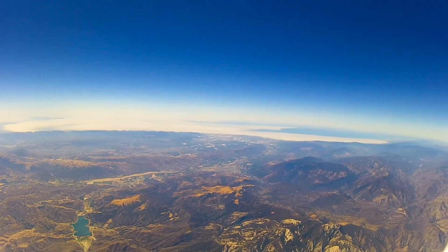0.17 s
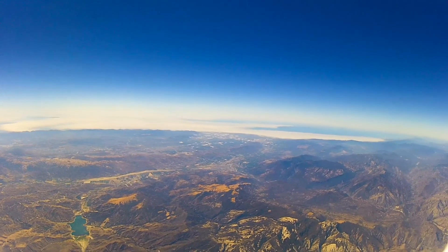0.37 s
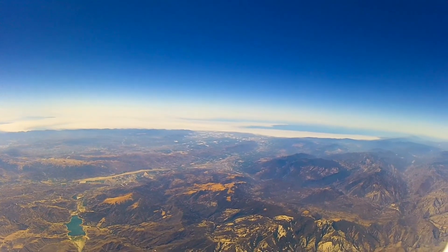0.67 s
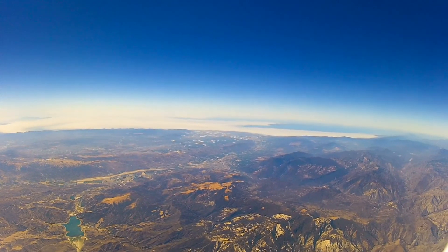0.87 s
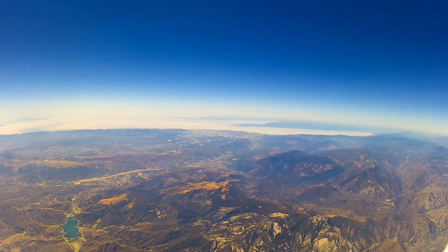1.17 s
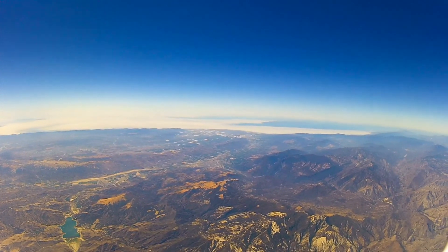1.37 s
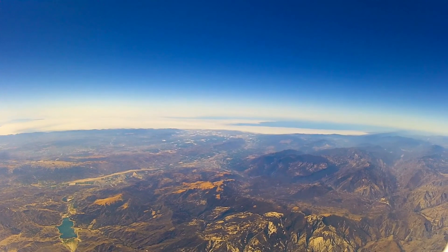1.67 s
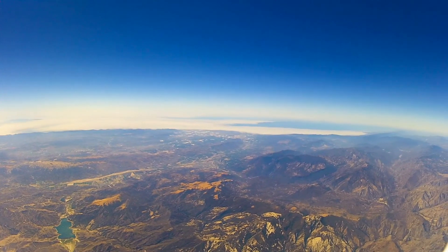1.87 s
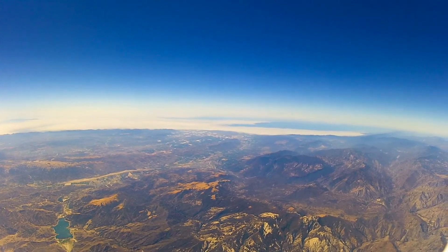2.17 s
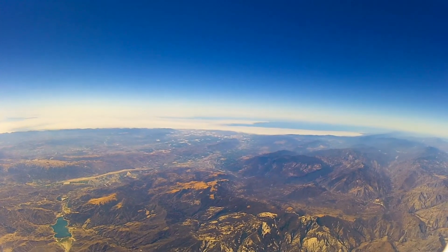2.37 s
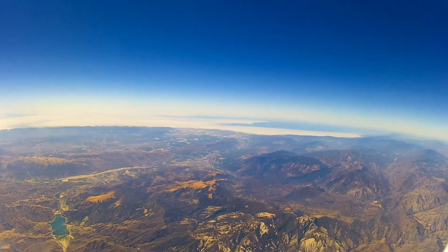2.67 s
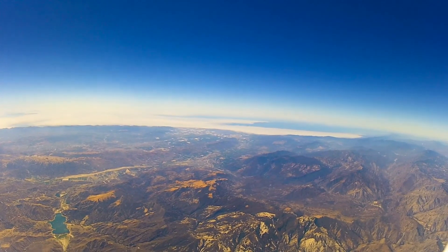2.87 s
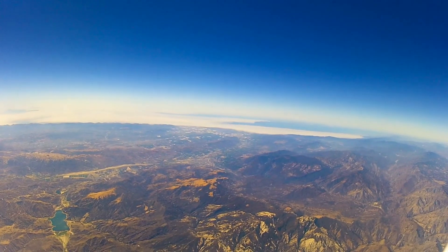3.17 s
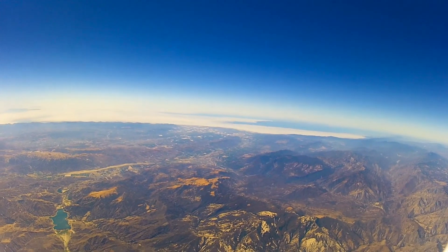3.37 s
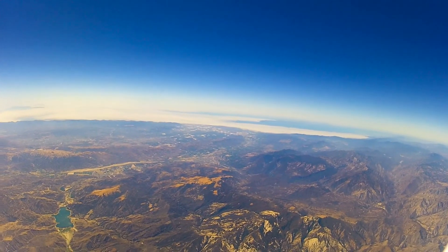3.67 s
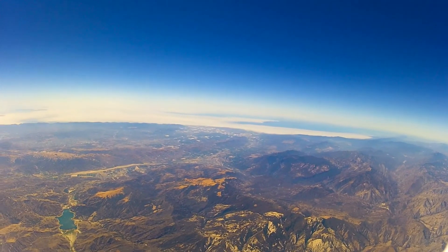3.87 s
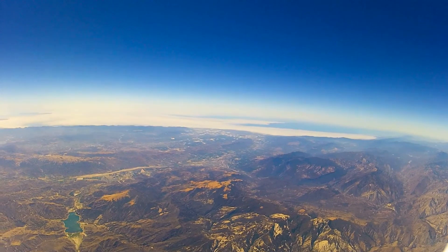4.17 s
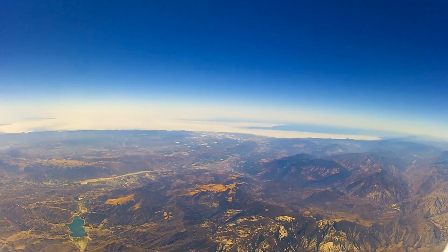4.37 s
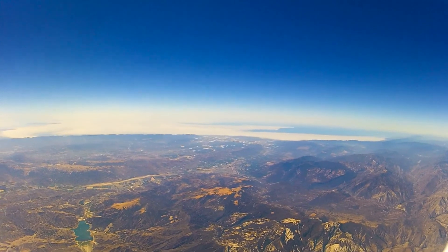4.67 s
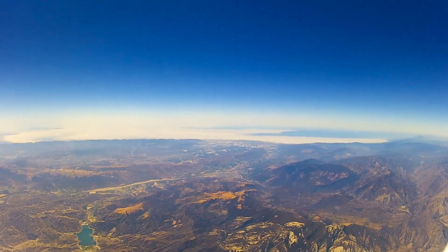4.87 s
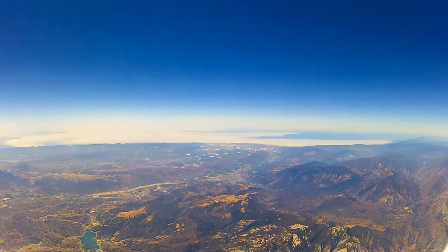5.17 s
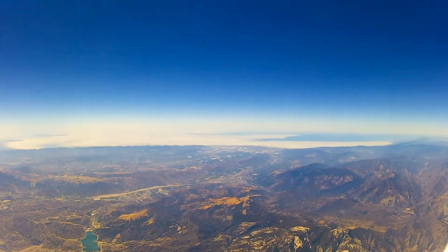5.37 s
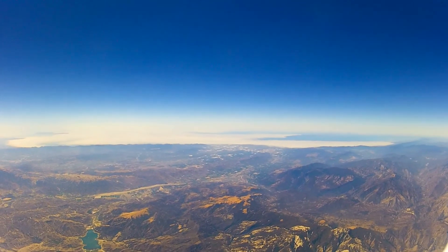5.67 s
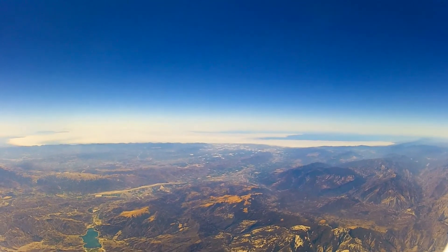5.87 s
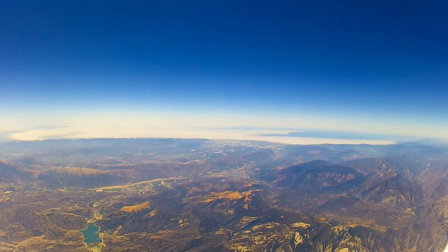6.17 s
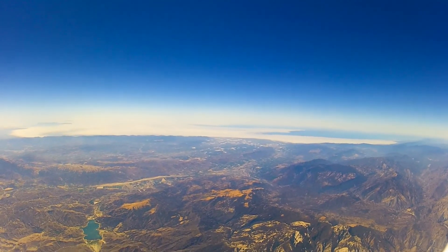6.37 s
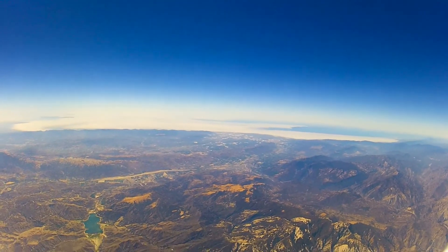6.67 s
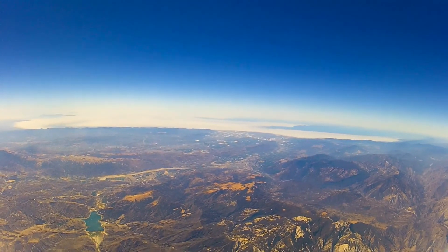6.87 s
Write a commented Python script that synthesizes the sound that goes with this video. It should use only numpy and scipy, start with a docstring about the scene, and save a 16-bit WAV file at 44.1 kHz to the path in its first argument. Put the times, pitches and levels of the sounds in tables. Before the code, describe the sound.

Faint steady low hum under soft hiss, with scattered small plastic clicks and hollow ticks, one far louder sharp knock just past four seconds.

```python
"""A faint, wavering hum of a box under microphone hiss comes first: filtered noise, in a balloon payload
high up in thin, still air. Then the case of a small camera slips in its mount, again and again: each slip
is a gritty crack of noise grains, a short hollow knock of decaying housing modes and a shake of the mount.
The camera samples slowly and holds each sample, which mirrors every low sound into a thin, glassy sheen
around its sampling rate."""
import sys
import numpy as np
from scipy import signal
from scipy.fft import rfft, irfft
from scipy.io import wavfile
from scipy.ndimage import uniform_filter1d

SR = 44100
rng = np.random.default_rng(int(sys.argv[2]) if len(sys.argv) > 2 else 0)


def inscribe(sig):
    """Save sig as 16-bit PCM at rate SR to the path in sys.argv[1].

    A 1-D sig is mono; a 2-D sig holds one channel per row.
    Samples are clipped to [-1, 1] before scaling.
    """
    pcm = np.round(np.clip(np.atleast_2d(sig).T, -1, 1) * 32767)
    wavfile.write(sys.argv[1], SR, pcm.astype(np.int16))


N = 310023

# Spectrum of the microphone hiss. Each row: frequency in Hz, relative level in dB.
HISS_SPECTRUM = [(100, 4), (700, 0.5), (1500, -3.5), (3000, -7), (4500, -8.5), (6000, -8.5)]
# Spectrum of the broad hum in the box. Each row: frequency in Hz, relative level in dB.
HUM_SPECTRUM = [(20, -27), (40, -11.5), (70, -9), (98, -1), (135, -5), (165, -16.5), (250, -20.5),
                (335, -17.5), (450, -26), (800, -37), (2000, -65.5)]
# Spectrum of the crack. Each row: frequency in Hz, relative level in dB.
CRACK_SPECTRUM = [(300, -19.5), (800, -3), (1100, 7), (1400, -1.5), (1800, -6.5), (2150, 4), (2500, -0.5),
                  (2900, 0), (3400, -4), (4200, -8), (5000, -20), (6000, -25)]
# Modes of the housing. Each row: frequency in Hz before the pitch factors, relative level in dB,
# 60 dB decay time in seconds, direction of swing at the microphone as a sign.
HOUSING_MODES = [ (123, -24, .176, -1), (150, -8.1, .046, -1), (237, -9.8, .049, 1), (304, -6.8, .057, -1),
                 (352, .5, .039, 1), (421, -19.6, .056, -1), (456, -15.6, .044, 1), (670, -16.5, .022, 1),
                 (770, -31, .055, -1), (817, -10.5, .018, -1), (1076, -13, .013, -1), ]
# Slips of the case. Each row: time of the ring in seconds, relative level in dB,
# hardness of the contact as dB of crack, thump in dB, pitch factor of the body.
SLIP_EVENTS = [ (0.486, -40.5, -3, 11, 1.52), (0.5569, -22, 4, -0.5, 1.158), (0.5681, -32.5, -6, 10, 1.46),
               (0.6241, -29.5, 6.5, 1, 1.4), (0.631, -34, -2, 5, 1.24), (0.6552, -33, -13, 6, 1.03),
               (1.6443, -66, 27, 0, 1.0), (2.3175, -32, 10, 7.5, 1.36), (2.4156, -60.5, 15.5, 0, 1.0),
               (3.169, -59.5, 19, 7, 1.2), (3.5349, -32, 6, -4, 1.03), (4.2377, 0, 0, 0, 1.0),
               (4.6404, -30, -30, 5.5, 0.98), (4.7960, -34.5, 5.5, 11.5, 1.34),
               (5.3854, -37, -12, 10, 0.98), (5.8103, -49, 11.5, -6, 1.36), (5.9010, -52, -3, -3, 0.93),
               (6.375, -34.5, 8, 13, 1.26), (6.3927, -45.5, 8, 9, 1.67), (6.5304, -29, 7.5, 11.5, 0.67),
               (6.7569, -29, -6, 4.5, 1.21), (6.7763, -34.5, -18, -2, 1.4), (6.7944, -26, -3.5, 9, 1.25),
               (6.8003, -24.5, -17.5, 8.5, .87), (6.836, -33, -22, 9, 0.83), (7.0123, -59.5, 19, 1, 1.0), ]

HOLD_HZ = 12000  # sampling rate of the camera
TOP_HZ = 14900  # upper limit of the held sound
# The briefer the contact, the more it rings the stiff walls: hard and light contacts are brief.
KNOCK_DB_PER_HARD_DB, KNOCK_DB_PER_LIGHT_DB = 0.3333, 0.2026
# A harder contact also rings the walls higher, up to a limit (pitch factors).
WALL_PITCH_PER_HARD_DB, WALL_PITCH_MAX = 0.03, 1.1


def undb(db):
    """Logarithmic level: 20 dB is a factor of ten in amplitude."""
    return 10 ** (np.asarray(db) / 20)


def level(x, db):
    """Root-mean-square level: scale the signal to the given dB."""
    return x * undb(db) / np.sqrt(np.mean(x ** 2))


def fade(t, t60):
    """Exponential damping: the amplitude falls by 60 dB in t60 seconds."""
    return np.exp(-np.log(1000) * t / t60)


def colour(x, points):
    """Minimum-phase filtering: a causal response that follows (Hz, dB) points."""
    hz, db = np.transpose(points)
    size = 2 * len(x)
    freqs = np.maximum(np.fft.rfftfreq(size, 1 / SR), 1)
    log_gain = np.log(undb(np.interp(np.log(freqs), np.log(hz), db)))
    # folding the cepstrum onto positive times makes the response causal
    cepstrum = irfft(log_gain)
    cepstrum[1:len(x)] *= 2
    response = np.exp(rfft(cepstrum[:len(x)], size))
    return irfft(rfft(x, size) * response)[:len(x)]


def resonate(x, hz, width_hz):
    """Simple resonance: a two-pole band-pass with gain 1 at the centre."""
    b, a = signal.iirpeak(hz, hz / width_hz, fs=SR)
    return signal.lfilter(b, a, x)


def resonate_twice(x, hz, width_hz):
    """Cascaded resonance: two equal band-passes give steeper skirts."""
    return resonate(resonate(x, hz, width_hz), hz, width_hz)


def walk(rate):
    """Random drift: twice-averaged random steps, rate per second, with a spread near 1."""
    k = int(SR / rate)
    steps = np.repeat(rng.standard_normal(N // k + 1), k)
    smooth = uniform_filter1d(uniform_filter1d(steps, k), k)
    return 1.4 * smooth[:N]


def hiss():
    """Stationary noise: the microphone hiss keeps one spectrum and one level."""
    return level(colour(rng.standard_normal(N), HISS_SPECTRUM), -64)


def hum(drone_hz=96, drone_width_hz=8, drone_db=-56, box_db=-51.0, waver_db=0.32):
    """Resonance under random excitation: a low hum, strongest at one narrow resonance of the box."""
    box = level(colour(rng.standard_normal(N), HUM_SPECTRUM), box_db)
    drone = level(resonate_twice(rng.standard_normal(N), drone_hz, drone_width_hz), drone_db)
    waver = undb(waver_db * walk(5.5))
    return (box + drone) * waver


def mount(t, thump_db, shake_db=-42, shake_t60=0.25, panel_db=-54, panel_t60=0.046):
    """Damped vibration: the payload box shakes on after a slip, and its panels die away sooner."""
    shake = resonate_twice(rng.standard_normal(len(t)), 140, 90)
    panels = resonate_twice(rng.standard_normal(len(t)), 645, 500)
    spread = 1 - fade(t, .05)  # the blow takes a moment to spread through the box
    shake = level(spread * shake * fade(t, shake_t60), shake_db + thump_db)
    panels = level(spread * panels * fade(t, panel_t60), panel_db)
    return shake + panels


def contact(db, hard_db):
    """Contact time: hard or light contacts knock louder, hard ones higher; gives knock dB, wall pitch."""
    knock_db = KNOCK_DB_PER_HARD_DB * hard_db - KNOCK_DB_PER_LIGHT_DB * db
    wall_pitch = min(1 + WALL_PITCH_PER_HARD_DB * hard_db, WALL_PITCH_MAX)
    return knock_db, wall_pitch


def housing(t, thump_db, knock_db, body_pitch, wall_pitch):
    """Modal sum: place and grip of the contact weight and tune the box (thump) and stiff walls (knock)."""
    out = 0
    for hz, db, t60, swing in HOUSING_MODES:
        thumps = hz < 270
        knocks = 600 < hz < 1000
        pitch = wall_pitch if hz > 600 else body_pitch
        tone = swing * np.sin(2 * np.pi * hz * pitch * t)
        gain = undb(db + thumps * thump_db + knocks * knock_db)
        out = out + gain * tone * fade(t, t60)
    return out


def crack(t, length_s=0.003, ending=1.1, grit_db=3, body_db=-41, snap_s=0.0006, snap_db=18):
    """Stick-slip: tiny impacts around one clean snap as the plastic lets go, dying as it grips again."""
    grains = rng.standard_normal(len(t)) * undb(grit_db * rng.standard_normal(len(t)))
    grains = grains * np.exp(-(t / length_s) ** ending)
    snap = undb(snap_db) * (np.arange(len(t)) == int(snap_s * SR))
    return level(colour(snap + grains, CRACK_SPECTRUM), body_db)


def slips(lag_s=0.00045):
    """Impulse excitation: each slip cracks, the housing rings a moment later and the mount's shake swells."""
    t = np.arange(SR // 4) / SR
    out = np.zeros(N + 2 * len(t))
    for s, db, hard_db, thump_db, body_pitch in SLIP_EVENTS:
        start = int((s - lag_s) * SR)
        knock_db, wall_pitch = contact(db, hard_db)
        ring = housing(np.maximum(t - lag_s, 0), thump_db, knock_db, body_pitch, wall_pitch)
        slip = undb(hard_db) * crack(t) + ring + mount(t, thump_db)
        out[start:start + len(t)] += undb(db) * slip
    return out[:N]


def scene():
    """Superposition: the slips add to the hum and the hiss, in one channel."""
    return (hiss() + hum() + slips())[None]


def record(dry, band_hz=5450):
    """Sample and hold: the steps mirror the band-limited sound around the sampling rate."""
    x = signal.sosfilt(signal.butter(N=10, Wn=band_hz, fs=SR, output="sos"), dry)
    sampled = signal.resample_poly(x, HOLD_HZ, SR, axis=1)
    steps = np.repeat(sampled, 4, axis=1)  # each value held for four finer steps
    x = signal.resample_poly(steps, SR, 4 * HOLD_HZ, axis=1)[:, :N]
    return signal.sosfilt(signal.ellip(8, .2, 70, TOP_HZ, fs=SR, output="sos"), x)


dry = scene()
out = record(dry)
inscribe(out)
```